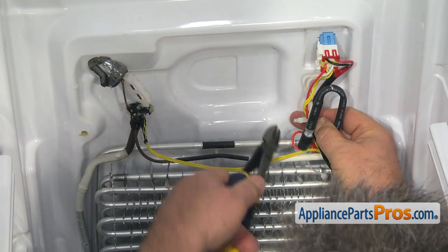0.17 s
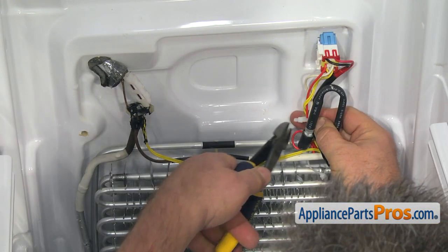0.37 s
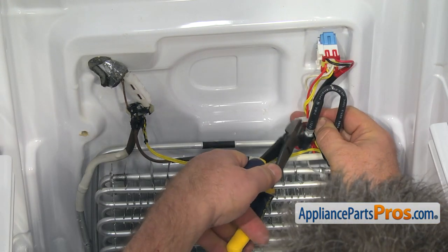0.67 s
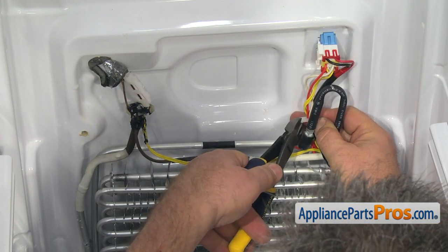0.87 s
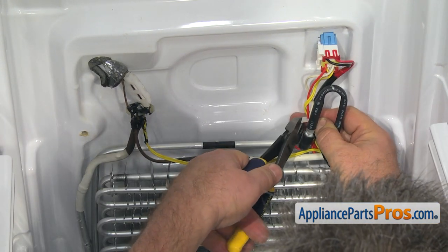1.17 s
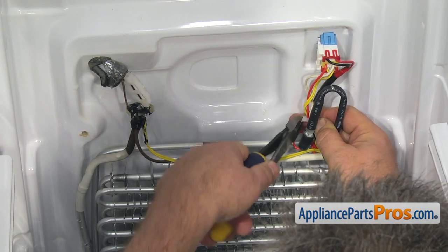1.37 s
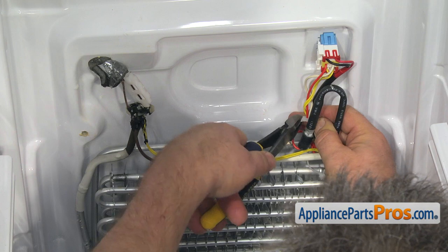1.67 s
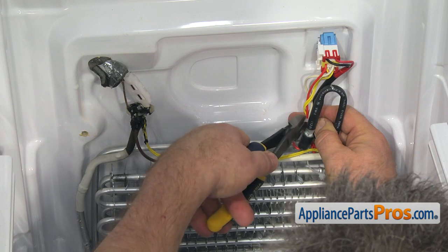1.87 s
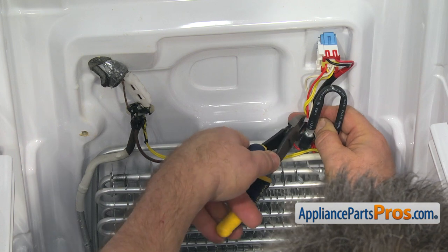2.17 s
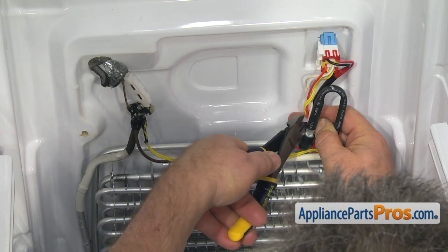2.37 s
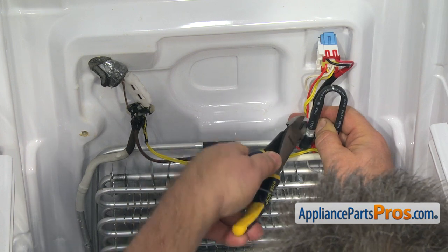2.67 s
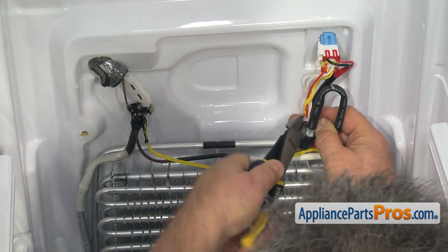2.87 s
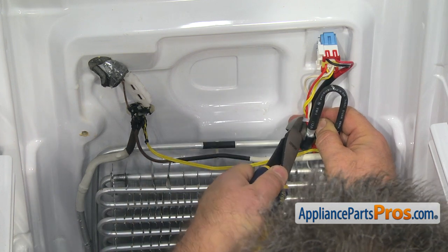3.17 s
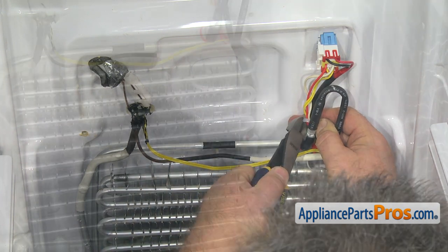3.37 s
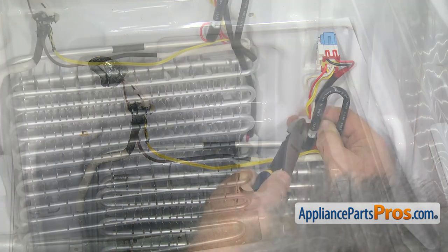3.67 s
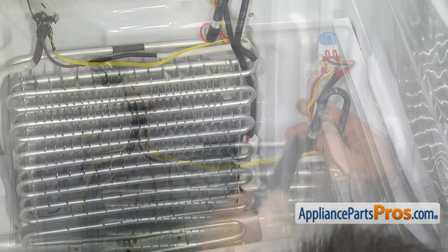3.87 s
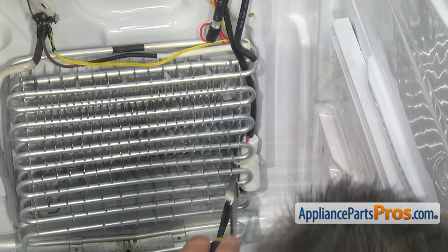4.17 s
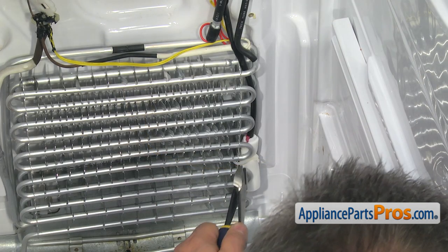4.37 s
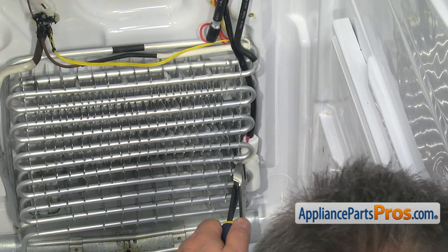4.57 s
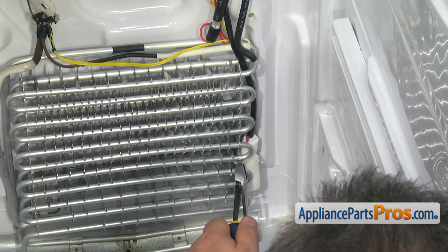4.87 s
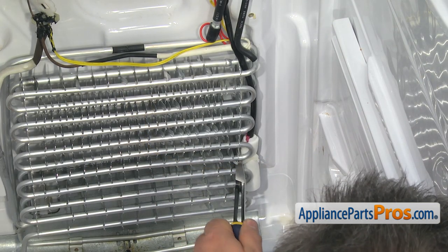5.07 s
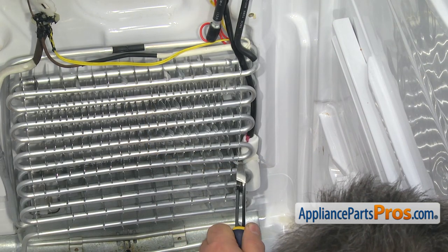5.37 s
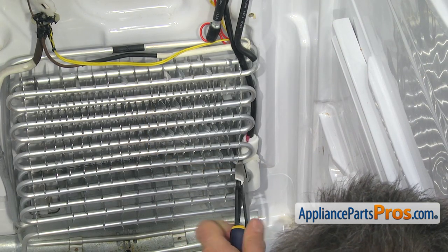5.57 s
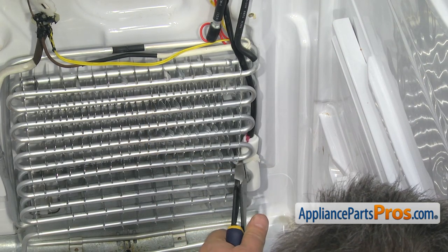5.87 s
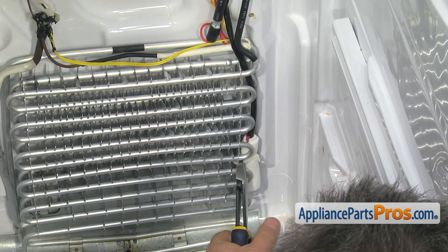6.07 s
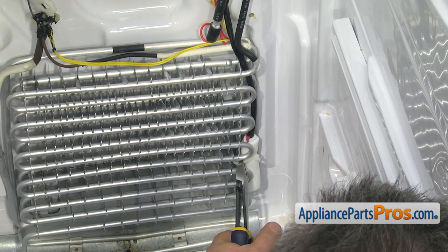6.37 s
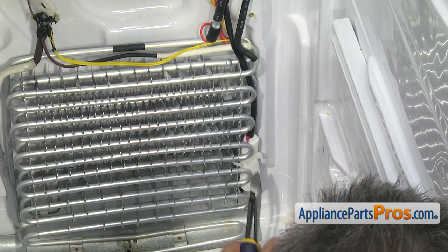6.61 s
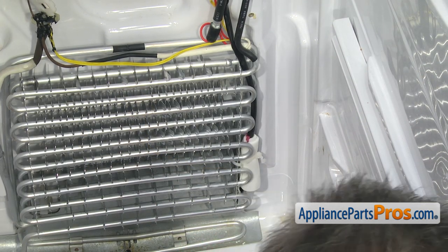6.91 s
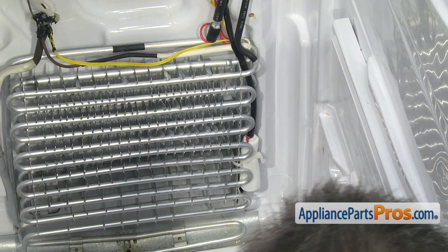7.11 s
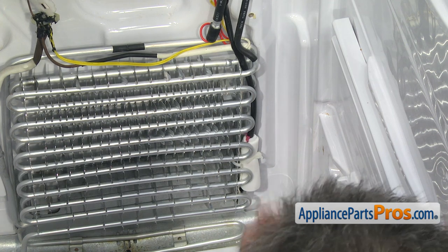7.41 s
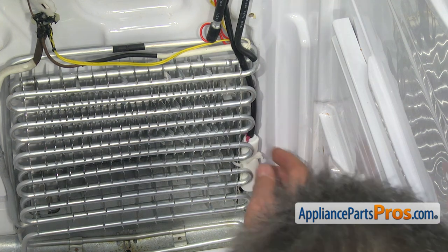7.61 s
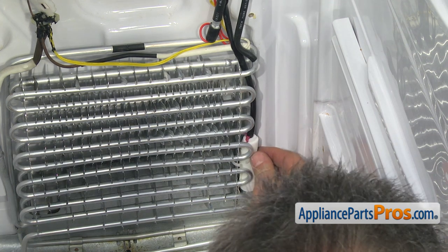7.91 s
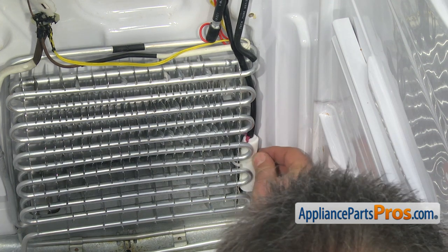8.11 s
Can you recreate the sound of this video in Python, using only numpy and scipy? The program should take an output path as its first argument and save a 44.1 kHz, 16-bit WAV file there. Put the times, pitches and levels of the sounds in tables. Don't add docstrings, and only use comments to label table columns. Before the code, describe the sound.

Inside an open appliance cabinet, hands work with side cutters. Faint steel ticks and scuffs lead to a loud, bright snap as a plastic tie is cut, its end bouncing. Softer knocks against the metal fins follow, then a second loud snip with a bouncing end. Sleeve rustle and small clicks finish. Close microphone, short dense boxy reflections, faint low rumble of distant air handling.

```python
import sys
import numpy as np
from scipy import signal
from scipy.fft import rfft, irfft, next_fast_len
from scipy.io import wavfile

SR = 44100
rng = np.random.default_rng(int(sys.argv[2]) if len(sys.argv) > 2 else 0)


def put_to_file(sound):
    columns = np.atleast_2d(sound).T
    safe = np.clip(columns, -1, 1)
    whole_steps = np.round(safe * 32767)
    wavfile.write(sys.argv[1], SR, whole_steps.astype(np.int16))


def makeup_ratio(level_db):
    decades = np.asarray(level_db, float) / 20
    return 10 ** decades


N = 363825

# [t/s, peak level/dB, build-up/ms, decay stretch, mode level/dB]
BLOWS = [
    (3.5198, -6, 8.5, 0.61, -30.5),
    (3.63, -36, 0.55, 0.31, -24),
    (4.644, -40.5, 7.2, 1, 1.5),
    (5.177, -21.5, 4.72, 0.89, -12),
    (6.471, -10, 5.1, 0.78, -18.5),
    (6.615, -26.5, 4.67, 0.83, -18),
]
# [f/Hz, level/dB per Hz]
BLOW_COLOURS = [
    [(240, -39.5), (400, -16.5), (504, -17), (752, -11.5), (1520, -9.5), (1620, -15), (4270, -12.5),
     (7000, -16), (8600, -7), (12200, -1), (15800, -10)],
    [(290, -40), (500, -10), (829, 3.5), (2380, -4), (2960, -18), (4560, -19), (6180, -35), (8860, -21),
     (15800, -41)],
    [(350, -12), (600, -0.5), (845, -14), (1630, -17.5), (3970, -34.5), (7050, -25), (8770, -31),
     (13400, -29), (15800, -34)],
    [(350, -22), (600, -7.5), (688, -7), (833, -6), (1380, -26), (1700, -11), (3320, -25.5), (5430, -13.5),
     (7340, -13.5), (15800, -18)],
    [(290, -29), (500, -9), (1480, -12.5), (2450, -6.5), (2710, -24.5), (3730, -4), (4500, -11), (5580, -8),
     (10900, -1.5), (15800, -4.5)],
    [(180, -23), (300, -11), (582, 2.5), (825, 1.5), (1680, -4), (2630, -14), (3920, -18.5), (7010, 0.5),
     (15800, -8.5)],
]
# (t/s, level/dB, colour [f/Hz, level/dB per Hz],
# build-up/ms, decay stretch)
FIN_GRAZE = (5.168, -53, [(300, -3), (450, 3), (1000, -11), (1800, -5), (5000, -14), (15000, -22)],
             22.0, 1.5)
# [f/Hz, level/dB, t60/s]
FIRST_SNIP_MODES = [
    [(128.8, 8, 0.079), (223, 14.5, 0.0667), (302, 14.5, 0.068), (325.2, 4.5, 0.12), (914, -2, .1),
     (1067, -22, 0.2146), (1530, -15, .2)],
    [(960, -7, 0.044), (1130, 7, 0.081), (2400, 8, 0.047), (1500, 12, 0.073), (4360, 6, 0.075)],
]
KNOCK_MODES = [
    [(93, 1, .2), (183, 3, 0.12), (274, -2, 0.078), (366, 6, 0.19), (417, -4, 0.17), (448, -18, 0.62),
     (516, -8, 0.22), (593, -3, 0.08), (675, -8, 0.11), (805, -27, 0.3), (913, -26.5, 0.69),
     (1300, -29, .4)],
    [(92.3, 5.5, 0.49), (139.4, 5.5, 0.23), (179.7, 14.5, 0.12), (250, 3, 0.17), (296, -7, 0.29),
     (370, 3, 0.21), (445.6, 3.5, 0.2), (570, -9, 0.097), (640, -10, 0.11), (807, -11, 0.36),
     (1035, -20, 0.8), (1270, -15, 0.31), (1570, -8.5, 0.2), (2220, -11, 0.26)],
]
SECOND_SNIP_MODES = [
    [(122, 4, 0.11), (158, -7, 0.37), (210, 3, 0.092), (325.5, 3.5, .09), (426.3, 1, 0.19), (590, -3, 0.16),
     (990, 5, 0.062), (2200, 10, .04), (747, -16, .35), (1007, -21.5, 0.4), (1300, -18.5, 0.22),
     (1540, -17, 0.29), (2180, -9.5, 0.18)],
    [(190, 5, 0.11), (361, 5, 0.15), (558, 7, 0.13), (753, -20, 0.93), (945, -15.5, 0.79),
     (1464, -16, 0.37), (1510, -19, 0.64), (1670, 0.5, 0.18), (393, -12.5, 0.75), (2630, 0, 0.13),
     (1920, 15.5, 0.05)],
]
# [t/s, level/dB, first f/Hz, last f/Hz, t60/s]
WALL_PUSHES = [
    (3.5171, -23, 70.9, 25.51, 0.14),
    (6.47, -20, 67.5, 39.7, 0.075),
]
# [t/s, peak level/dB, dull thud level/dB and mid knock level/dB against the click]
TICKS = [(0.042, -47.5, -20, -4), (0.282, -55.5, 23, 17), (0.819, -67, 6, 1), (1.394, -56, 12, -8),
         (1.817, -53, 17, 11), (1.86, -39, 1, 8), (2.102, -57.5, 12, 23), (2.333, -46.5, 9.5, 9),
         (2.372, -49.5, 13, 13), (2.487, -49.5, 10, 7), (2.56, -53, 6, -1), (2.628, -54, 4, 3),
         (2.851, -56, -4, -6), (3.05, -58, -20, 14), (4.179, -53, -17.5, -1), (5.373, -52.5, 31, 11.5),
         (7.676, -56.5, 4, 1), (7.72, -49, 17, 13), (7.851, -38.5, 2, 13), (8.08, -54, -23, 5),
         (8.209, -37, -13, -1.5), (8.222, -43, -17, -23)]
# [t/s, peak level/dB, thud level/dB, knock level/dB]
SCUFFS = [(1.583, -57.5, -7, -9), (2.654, -47.5, -5, -4), (3.763, -46.5, 13, 8), (3.886, -44, 4.5, -3),
          (5.474, -57, -2, -19.5), (5.57, -46.5, 10, 4), (5.619, -55, 10, 8), (5.7, -60, 10, 1),
          (5.835, -53.5, 3, 7), (7.146, -44, 3, 4.5), (7.755, -61, -15, -13), (7.945, -47.5, -21, 1.5),
          (8.138, -45, -11, -4)]
# [f/Hz, level/dB]
LINER = [(280, 0.5), (1600, -1), (3100, -5), (4500, 3), (5800, 0.5), (7500, 3), (9500, 3.5), (12000, 1.5),
         (15900, -3)]
# [t/s, peak level/dB, f/Hz, t60/s]
TINGS = [(0.0428, -41, 8000, 0.019), (1.5838, -61, 7350, 0.04), (1.8582, -45.5, 7100, 0.032),
         (3.8856, -62, 5580, 0.02), (7.8506, -47.5, 7300, 0.042), (8.085, -51, 6660, 0.038),
         (8.2087, -36, 9090, 0.028), (8.2224, -44, 6750, 0.044), (0.0423, -51, 3900, 0.032),
         (2.6504, -61, 4120, 0.052), (3.6311, -52, 4500, 0.03), (7.6765, -53.5, 3520, 0.014),
         (7.9438, -66.5, 4140, 0.04), (8.2092, -50, 3680, 0.045), (1.3952, -63, 2500, 0.03),
         (3.058, -69, 2050, 0.08), (5.1844, -47, 1920, 0.045), (6.6154, -45, 2620, 0.068)]
# [t/s, peak level/dB, f/Hz, t60/s]
PINGS = [(0.813, -69, 875, 0.06), (0.851, -65, 2500, 0.032), (1.395, -68, 1820, 0.03),
         (1.858, -61, 807, 0.06), (1.899, -59, 829, 0.072), (1.941, -58.5, 895, 0.06),
         (2.103, -66, 1490, 0.051), (2.336, -59, 1040, 0.12), (2.489, -66, 696, 0.051),
         (3.05, -73, 1710, 0.06), (3.631, -40, 1700, 0.018), (3.6303, -51, 4850, .015),
         (7.721, -55, 1055, 0.046), (7.852, -51.5, 1610, 0.093)]
# [t/s, peak level/dB, f/Hz, t60/s]
SNAPS = [(0.0425, -47, 8540, 0.0065), (1.3945, -65, 2200, .012), (1.584, -65, 5200, .015),
         (2.1025, -63, 1500, .02), (2.4875, -59, 1200, .012), (2.1025, -72, 850, .02),
         (2.109, -66, 1430, .04), (3.051, -59, 1700, .03), (3.634, -39, 2400, .02),
         (4.642, -52, 1700, .012), (8.083, -62, 4970, 0.0074), (3.6308, -38, 1210, 0.0075),
         (3.6308, -38, 4900, .01), (3.6338, -38, 1000, 0.0087), (3.6405, -42, 4200, .008),
         (4.646, -50.5, 643, 0.065), (5.1865, -36, 1770, 0.037), (5.194, -44, 1530, .035),
         (6.847, -69, 1820, .025), (6.847, -71, 1330, 0.026), (8.2085, -41, 7990, .006)]
# [t/s, peak level/dB, f/Hz, t60/s]
BUMPS = [(1.447, -69, 163, 0.075), (1.861, -59.5, 191, 0.063), (2.337, -72, 363, 0.54),
         (3.89, -60, 342, 0.038), (3.9, -60.5, 157.2, 0.19), (5.151, -56, 403, 0.056),
         (5.512, -64, 148, 0.11), (5.85, -64.5, 168, 0.12), (5.601, -67, 380, 0.084),
         (5.631, -67, 190, 0.08), (5.66, -68, 403, 0.11), (5.98, -65.5, 183, 0.14),
         (7.153, -61, 151.6, 0.09), (7.853, -67, 170, 0.13), (8.21, -59.5, 157, 0.11)]
# [t/s, half length/s, cloth level/dB, handling level/dB, liner rub level/dB]
MOVES = [(0.018, 0.45, -76.5, -79.5, -99), (1.867, 0.12, -96, -77, -73.5), (2.497, 0.25, -100, -79.5, -95),
         (2.88, 0.21, -87, -99, -85.5), (3.768, 0.23, -85, -72, -73.5), (3.999, 0.3, -78, -77, -80.5),
         (4.277, 0.15, -79.5, -82.5, -72.5), (5.117, .1, -76.5, -78, -79.5),
         (5.563, 0.2, -82.5, -75.5, -71), (6.604, 0.12, -80.5, -65.5, -67.5), (7.047, 0.2, -77, -80, -100),
         (7.278, 0.13, -68, -72, -99), (7.547, 0.29, -78.5, -82, -88), (7.86, 0.14, -93, -74, -75),
         (8.24, 0.11, -71, -68.5, -71)]
# [f/Hz, level/dB per Hz]
CLOTH = [(1500, -9.5), (3000, -4.5), (6000, -3), (11000, -2.5), (15800, -6)]
# [f/Hz, level/dB per Hz]
HANDLING = [(125, 0), (200, 0), (360, -8.5), (800, -5.5), (1600, -10.5), (3500, -21.5)]
# [f/Hz, t60/s]
CAVITY_T60 = [(100, 0.33), (260, 0.33), (700, 0.12), (1840, 0.11), (4850, 0.13), (12800, 0.11)]
# [f/Hz, level/dB per Hz]
ROOM_TAIL = [(300, -4), (900, -3), (1600, -10), (3000, -11.5), (8000, -11), (15800, -21)]
# [f/Hz, width/Hz]
HUM = [
    (83, 14),
    (360, 38),
    (795, 320),
]
# [t/s, level/dB]
RUMBLE = [(0.0, -73.5), (.25, -60), (1.1, -67.5), (1.9, -58.5), (2.55, -57), (3.2, -70), (3.7, -71),
          (4.05, -62), (4.3, -67), (4.75, -54), (5.15, -70), (5.75, -59.5), (6.1, -71), (6.85, -59.5),
          (7.12, -66), (7.33, -53.5), (7.8, -73.5), (8.25, -62)]
# [f/Hz, level/dB per Hz]
FLOOR = [(12, -48), (20, -14.5), (85, -1.5), (113, -22), (145, -9), (176, -34), (247, -17), (326, -36.5),
         (355, -33), (775, -42.5), (916, -45.5), (14500, -50), (15800, -51)]
# [f/Hz, level/dB per Hz]
PREAMP = [(15, -9), (28, 3.5), (45, -14.5), (80, -22), (120, -35), (170, -39.5), (250, -29), (600, -29),
          (14000, -28), (15800, -33)]

BAND_EDGES = 20 * 2 ** np.arange(0, 9.9, 1 / 3)
BAND_HZ = np.sqrt(BAND_EDGES[1:] * BAND_EDGES[:-1])
STEP = 8
STEP_TIMES = np.arange(0, N, STEP) / SR
TING_DAMPING = 0.3


def rms_one(x):
    return x / np.sqrt(np.mean(x ** 2) + 1e-20)


def band_gains(points):
    hz, db = np.transpose(points)
    gain = makeup_ratio(np.interp(np.log(BAND_HZ), np.log(hz), db, left=-80, right=-80))
    return gain / np.sqrt(np.sum(gain ** 2 * np.diff(BAND_EDGES)) / (SR / 2))


def drift(rate):
    r = np.exp(-80 * np.pi * rate / SR)
    white = rng.standard_normal(N // 40 + 2002)
    slow = signal.lfilter([1], [1, -2 * r, r * r], white)[2000:]
    return np.interp(np.arange(N) / 40, np.arange(len(slow)), rms_one(slow))


def ring(force, hz, t60):
    r, w = makeup_ratio(-60 / (t60 * SR)), 2 * np.pi * hz / SR
    return signal.lfilter([0, np.sin(w)], [1, -2 * r * np.cos(w), r * r], force + 1e-18)


def width_to_t60(width_hz):
    return np.log(1000) / np.pi / width_hz


def reflect(power, s, db, colour, rise_ms, stretch):
    room_db, room_t60_s = -39.5, 0.37
    start = round((s - rise_ms / 1000) * SR / STEP)
    t = np.arange(min(SR // 2 // STEP, power.shape[1] - start)) * STEP / SR
    hz, cavity_s = np.transpose(CAVITY_T60)
    t60 = stretch * np.interp(np.log(BAND_HZ), np.log(hz), cavity_s)
    build = (1 - np.exp(-(t * 1000 / rise_ms) ** 2)) ** 2
    gains = makeup_ratio(db) * band_gains(colour)
    room = gains * makeup_ratio(room_db) * band_gains(ROOM_TAIL)
    near = gains[:, None] ** 2 * np.exp(-2 * np.log(1000) * t / t60[:, None])
    far = room[:, None] ** 2 * makeup_ratio(-120 * t / room_t60_s)
    power[:, start:start + len(t)] += build * (near + far)


def snips_and_knocks(power):
    for (s, db, rise_ms, stretch, _), colour in zip(BLOWS, BLOW_COLOURS):
        reflect(power, s, db - 3.0, colour, max(rise_ms, 0.3), stretch)
    reflect(power, *FIN_GRAZE)


def cavity_modes():
    first_fin_hz, fin_width = 700, 0.07
    tube_t60_s, tube_width = 0.25, 0.05
    lead, swell_share = 0.25, 0.97
    out = np.zeros(N)
    all_modes = FIRST_SNIP_MODES + KNOCK_MODES + SECOND_SNIP_MODES
    for (s, db, rise_ms, _, mode_db), modes in zip(BLOWS, all_modes):
        span = slice(round((s - lead * rise_ms / 1000) * SR), round((s + 0.8) * SR))
        t = np.arange(span.stop - span.start) / SR
        for hz, level_db, t60 in modes:
            if hz < first_fin_hz:
                sound = np.sin(2 * np.pi * hz * t)
            else:
                width = fin_width if t60 < tube_t60_s else tube_width
                white = rng.standard_normal(len(t))
                sound = rms_one(ring(white, hz, width_to_t60(hz * width)))
            swell = 1 - np.exp(-t * 1000 / (swell_share * rise_ms))
            out[span] += makeup_ratio(db + mode_db + level_db - 5 - 60 * t / t60) * swell * sound
    return out


def wall():
    slacken_s, swell_s = 0.012, 0.0031
    out = np.zeros(N)
    for s, db, first_hz, last_hz, t60 in WALL_PUSHES:
        t = np.maximum(np.arange(N) / SR - s, 0)
        extra_turns = (first_hz - last_hz) * slacken_s * (1 - np.exp(-t / slacken_s))
        swing = np.sin(2 * np.pi * (last_hz * t + extra_turns))
        out += makeup_ratio(db - 60 * t / t60) * (1 - np.exp(-t / swell_s)) * swing
    return out


def small_contacts(power, rows, rise_ms, stretch, trim_db):
    centre_hz, width_hz = (550, 1700, 4600, 10500), (700, 2000, 4000, 8000)
    liner_hz, liner_db = np.transpose(LINER)
    shared = np.interp(np.log(BAND_HZ), np.log(liner_hz), liner_db, left=-40, right=-40)
    for s, db, thud_db, knock_db in rows:
        edge_db = -4.5 + 0.38 * knock_db
        per_hz = np.array([thud_db, knock_db, edge_db, 0]) - 10 * np.log10(width_hz)
        own = np.interp(np.log(BAND_HZ), np.log(centre_hz), per_hz)
        reflect(power, s, db + trim_db, list(zip(BAND_HZ, own + shared)), rise_ms, stretch)


def shake(s, length_ms):
    start = round(s * SR)
    t_ms = np.arange(min(SR // 8, N - start)) / SR * 1000
    burst = rng.standard_normal(len(t_ms)) * np.exp(-t_ms / max(length_ms, 0.2))
    force = np.zeros(N)
    force[start:start + len(t_ms)] = rms_one(burst) / np.sqrt(len(t_ms))
    return force


def single_rings(rows, shake_ms, trim_db, damping=1):
    out = np.zeros(N)
    for s, db, hz, t60 in rows:
        span = slice(round(s * SR), round((s + 0.5) * SR))
        out[span] += makeup_ratio(db + trim_db) * ring(shake(s, shake_ms)[span], hz, t60 * damping)
    return out


def squeak():
    start, end, pitch_hz, level_db = 6.24, 6.4, 790, -76
    swell = np.sin(np.pi * np.clip((np.arange(N) / SR - start) / (end - start), 0, 1))
    turns = np.cumsum(pitch_hz * (1 + 0.0065 * drift(13))) / SR
    return makeup_ratio(level_db + 3.2 * drift(24)) * swell * np.sin(2 * np.pi * turns)


def moving(still_db, move_db):
    s, half_s = np.transpose(MOVES)[:2, :, None]
    bells = np.exp(-2 * ((STEP_TIMES - s) / half_s) ** 2)
    return np.sqrt(makeup_ratio(still_db) ** 2 + makeup_ratio(move_db) ** 2 @ bells)


def hum():
    rub_db = np.transpose(MOVES)[-1]
    rumble = makeup_ratio(np.interp(STEP_TIMES, *np.transpose(RUMBLE)))
    gains = rumble, moving(-87.5, rub_db), moving(-100, rub_db - 10)
    out = np.zeros(N)
    for (hz, width_hz), gain in zip(HUM, gains):
        t60 = width_to_t60(width_hz)
        once = ring(rng.standard_normal(N), hz, t60)
        out += np.repeat(gain, STEP)[:N] * rms_one(ring(once, hz, t60))
    return out


def steady_air():
    cloth_db, hand_db = np.transpose(MOVES)[2:4]
    cloth = moving(-83, cloth_db) * makeup_ratio(0.8 * drift(22)[::STEP])
    hands = moving(-84, hand_db) * makeup_ratio(3.0 * drift(8.3)[::STEP])
    floor = makeup_ratio(-64) * band_gains(FLOOR)[:, None]
    return floor ** 2 + np.outer(band_gains(CLOTH), cloth) ** 2 + np.outer(band_gains(HANDLING), hands) ** 2


def band_noise(power):
    white, out = rng.standard_normal((2, N)), np.zeros(N)
    for k, edges in enumerate(zip(BAND_EDGES, BAND_EDGES[1:])):
        sos = signal.butter(2, edges, "band", fs=SR, output="sos")
        envelope = np.repeat(np.sqrt(power[k]), STEP)[:N]
        out += signal.sosfilt(sos, white[k % 2] * envelope)
    return out


def scene():
    air = steady_air()
    power = np.zeros_like(air)
    snips_and_knocks(power)
    small_contacts(power, TICKS, rise_ms=0.93, stretch=0.95, trim_db=-14.0)
    small_contacts(power, SCUFFS, rise_ms=10.4, stretch=1.38, trim_db=-11.0)
    clumps = makeup_ratio(2 * 1.0 * drift(250)[::STEP])
    mono = band_noise(air + power * clumps / clumps.mean())
    mono += cavity_modes() + wall()
    mono += single_rings(TINGS, shake_ms=8.4, trim_db=-2.5, damping=TING_DAMPING)
    mono += single_rings(PINGS, shake_ms=3.7, trim_db=-2.5, damping=TING_DAMPING)
    mono += single_rings(SNAPS, shake_ms=0.2, trim_db=-2.5)
    mono += single_rings(BUMPS, shake_ms=26.0, trim_db=13.5, damping=0.45)
    mono += squeak() + hum()
    return np.array([mono, mono])


def top_cut(x):
    return signal.sosfilt(signal.butter(12, 16000, fs=SR, output="sos"), x)


def record(dry):
    overload = 0.25
    size = next_fast_len(N)
    hz, db = np.transpose(PREAMP)
    noise_hz = np.arange(size // 2 + 1) * SR / size
    gain = makeup_ratio(np.interp(np.log(noise_hz + 1), np.log(hz), db))
    noise = irfft(rfft(rng.standard_normal(size)) * gain, size)[:N]
    side = makeup_ratio(-79) * rms_one(noise) * [[1], [-1]]
    rounded = overload * np.tanh(dry / overload)
    gentle_cut = signal.cheby2(16, 22, 15800, fs=SR, output="sos")
    deep_cut = signal.cheby2(16, 50, 16750, fs=SR, output="sos")
    mix = signal.sosfilt(np.vstack([gentle_cut, deep_cut]), rounded + side)
    return top_cut(mix)


dry = scene()
out = record(dry)
put_to_file(out)
```